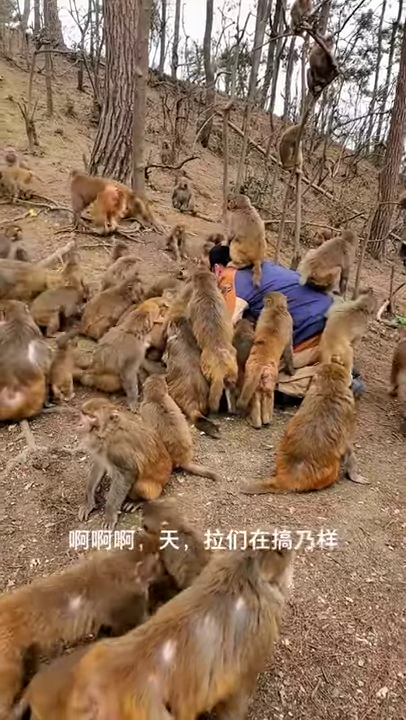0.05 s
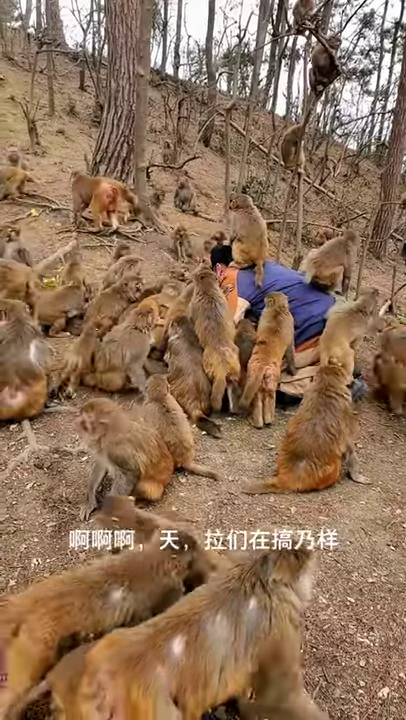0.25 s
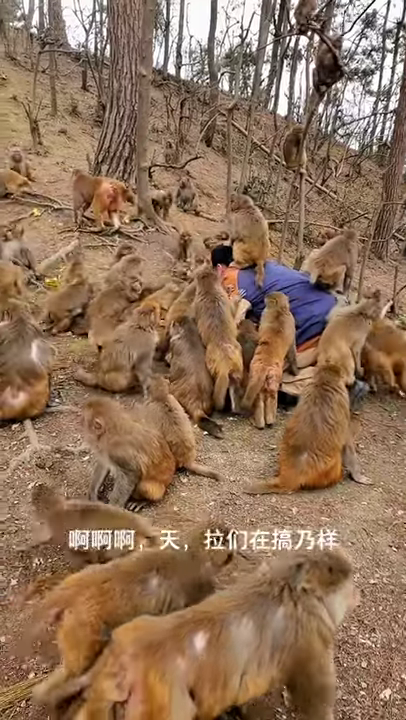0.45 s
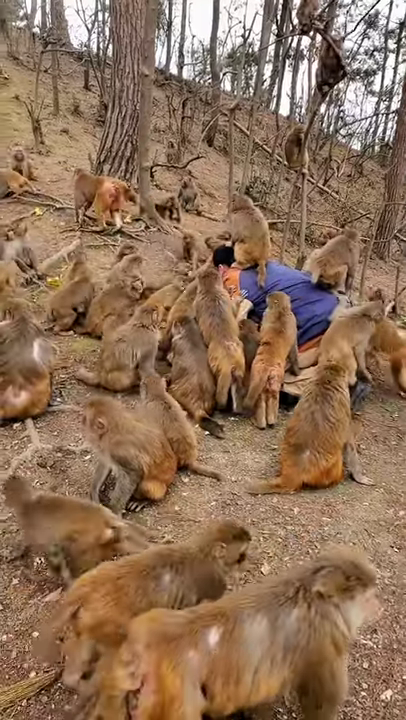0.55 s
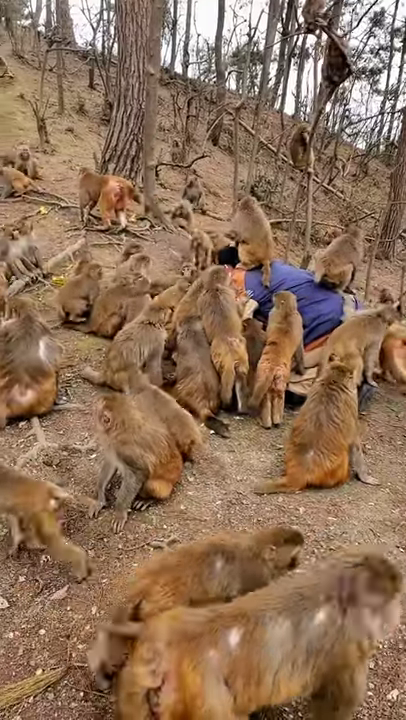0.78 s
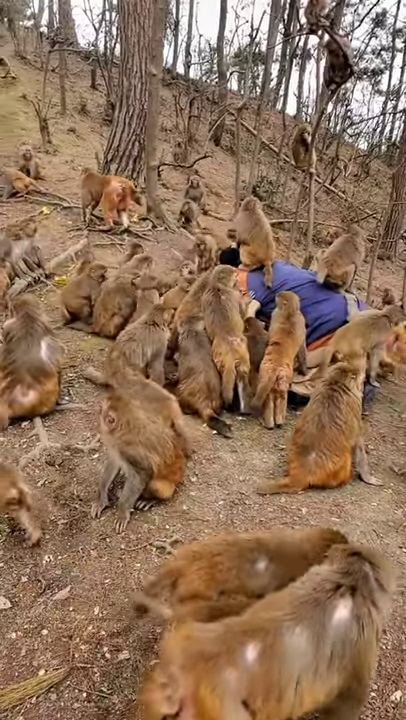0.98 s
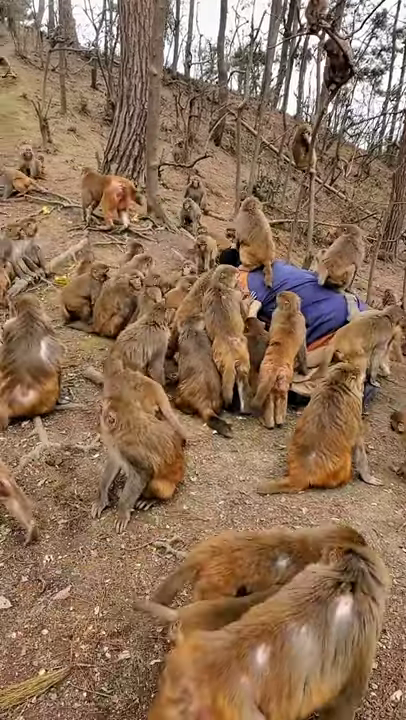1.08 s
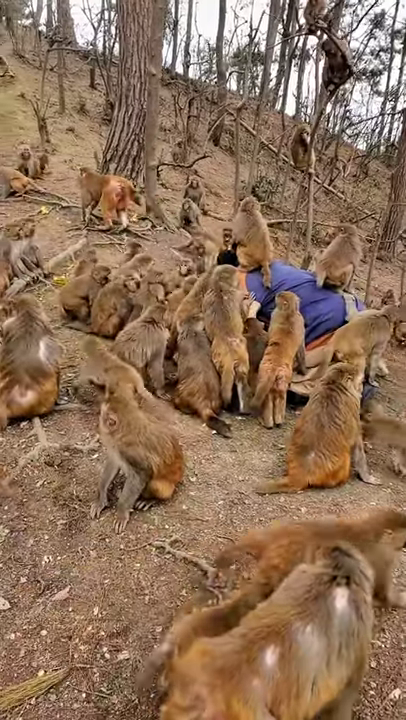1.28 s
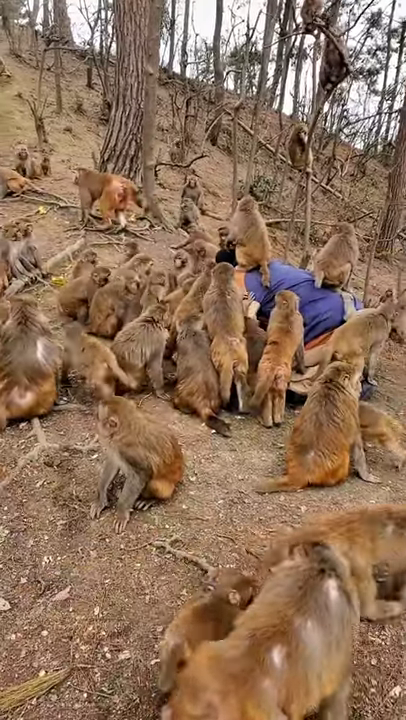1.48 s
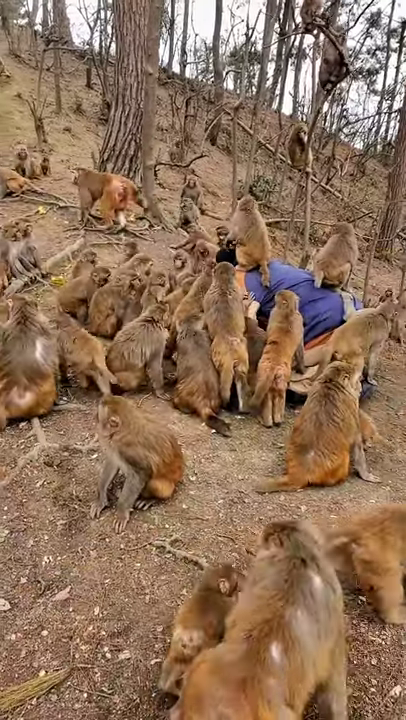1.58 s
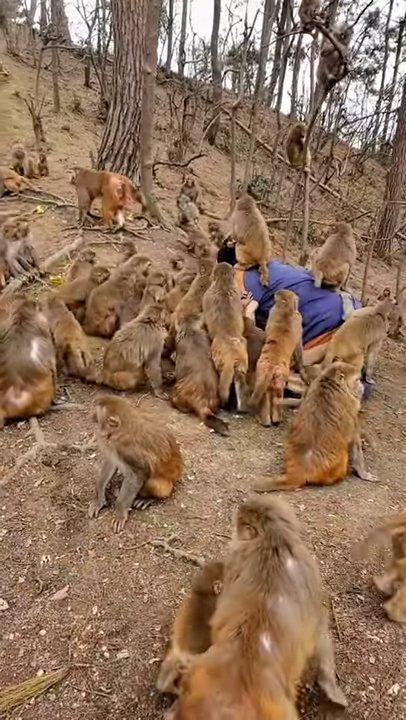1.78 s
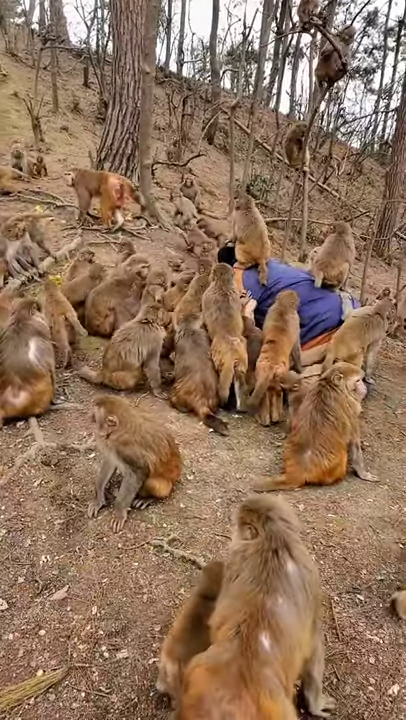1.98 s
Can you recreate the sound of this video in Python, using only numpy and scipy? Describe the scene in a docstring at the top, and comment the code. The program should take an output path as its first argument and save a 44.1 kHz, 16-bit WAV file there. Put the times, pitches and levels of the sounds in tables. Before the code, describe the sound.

Monkeys call over one another outdoors. A hoarse scream and short rasps open; a clear coo rises loudest at 0.2-0.4 s, another brief coo comes near 0.55 s with high squeals. Quieter coos follow at 0.9-1.5 s. A harsh shriek runs 1.4-1.85 s with thin squeals and a sharp yelp near 1.74 s, then a rising squeal at 1.9 s. Leaf rustle, low rumble, sparse woodland echoes; left side brighter.

```python
"""Macaque troop on a wooded hillside

Clear coos and thin high squeals are near sines from smoothly vibrating vocal folds, with weak overtones.
Harsh rasps and long screams are uneven pulses and puffs of air filtered by throat resonances.
Trunks and slope scatter the calls back as sparse decaying echoes; shaped noise gives the rustle of
leaf litter over a low outdoor rumble. Two microphone ports hear it, the left one brighter."""
import sys
import numpy as np
from scipy import signal
from scipy.fft import rfft, irfft, next_fast_len
from scipy.io import wavfile
from scipy.ndimage import uniform_filter1d

SR = 44100
rng = np.random.default_rng(int(sys.argv[2]) if len(sys.argv) > 2 else 0)


def bounce(signal):
    """Save signal as a 16-bit WAV file at the path given by the first command-line argument."""
    frames = np.transpose(np.atleast_2d(signal))
    limited = np.clip(frames, -1, 1)
    pcm = np.round(limited * 32767).astype(np.int16)
    wavfile.write(sys.argv[1], SR, pcm)


def rack_gain(trim_db):
    """Turn a fader trim in dB into the linear factor to multiply a signal by."""
    fader = np.asarray(trim_db, float)
    return 10 ** (fader / 20)


N = 90404


def evened(x):
    """Normalization: scales a signal to rms 1."""
    return x / np.sqrt(np.mean(x ** 2) + 1e-20)


def read(points, hz):
    """Interpolation on a logarithmic frequency axis, as hearing spaces frequencies."""
    f, value = np.transpose(points)
    return np.interp(np.log(hz + 1), np.log(f + 1), value)


def wobble(n, s):
    """Random modulation: noise averaged twice over s seconds, of rms 1."""
    size = max(round(s * SR), 1)
    smooth = uniform_filter1d(rng.standard_normal(n), size)
    return evened(uniform_filter1d(smooth, size))


def curve(rows):
    """Envelope and controls: a call's 3 ms edges and its columns interpolated over time."""
    rows = np.transpose(rows)
    t = np.arange(rows[0, 0], rows[0, -1], 1 / SR)
    edge = np.minimum(np.minimum(t - t[0], t[-1] - t) / 0.003, 1)
    return edge, [np.interp(t, rows[0], c) for c in rows[1:]]


def add(mix, s, sound, side_db, lead_ms):
    """Level and time differences between ports: side_db favours the left, the right hears lead_ms later."""
    n = next_fast_len(len(sound) + 64)
    hz = np.fft.rfftfreq(n, 1 / SR)
    delay = np.exp(-2j * np.pi * hz * abs(lead_ms) / 1000)
    late = irfft(rfft(sound, n) * delay, n)
    for row, part, db in ((0, sound, side_db / 2), (1, late, -side_db / 2)):
        spot = mix[row, round(s * SR):][:len(part)]
        spot += rack_gain(db) * part[:len(spot)]


def tonal(rows, second_db, third_db, waver):
    """Periodic phonation: smooth vocal folds give a near sine with weak harmonics, wavering together."""
    waver_share, waver_db, waver_s = .06, 8, .003  # pitch and level waver (rms) at waver 1
    fourth_db = -13  # below the third harmonic
    overtones_follow = .1  # share of the level changes that the overtones follow
    onset_db = -46  # below this level the overtones die with the voice
    closing_db, closing_from, closing_top_hz = -7, 2.5, 1500

    edge, (hz, db) = curve(rows)
    n = len(hz)
    hz, db = uniform_filter1d(hz, size=300), uniform_filter1d(db, size=100)
    phase = 2 * np.pi * np.cumsum(hz * (1 + waver_share * waver * wobble(n, waver_s))) / SR
    fourth = rack_gain(fourth_db) * np.sin(4 * phase) * (4 * hz < SR / 2)
    overtones = rack_gain(second_db) * np.sin(2 * phase) + rack_gain(third_db) * (np.sin(3 * phase) + fourth)

    # overtones fade as the lips close: closing_db for each octave per second that a pitch below
    # closing_top_hz falls faster than closing_from
    fall = -np.gradient(np.log2(hz)) * SR
    closing = closing_db * (hz < closing_top_hz) * np.clip(fall - closing_from, 0, 8)
    follow = np.minimum(overtones_follow * (db - db.max()), db - onset_db)
    overtone_gain = rack_gain(follow + closing + 2.5 * wobble(n, 0.012))
    tone = rack_gain(db) * np.sin(phase) + overtone_gain * overtones
    return np.sqrt(2) * edge * rack_gain(waver_db * waver * wobble(n, waver_s)) * tone


def add_tonal(mix, curves, callers):
    """Superposition: each periodic call is summed into the mix at its own place."""
    for rows, (second_db, third_db, waver, side_db) in zip(curves, callers):
        add(mix, rows[0][0], tonal(rows, second_db, third_db, waver), side_db, lead_ms=0.06)


def coos(mix):
    """Clear coos: low-pitched periodic phonation along gliding pitch curves."""
    # One curve per coo. Each row: time in seconds, pitch in hertz, level in dB before the waver.
    coo_curves = [
        [(0.175, 695, -53), (0.203, 826.5, -29), (0.259, 982, -16.5), (0.285, 1064, -11.5),
         (0.331, 1115, -15.5), (0.359, 1108, -17.5), (0.377, 1073, -14.5), (0.389, 1054, -28),
         (0.397, 1075, -40), (0.42, 1116, -62)],
        [(0.335, 687.4, -47.5), (0.561, 878, -42), (0.749, 745, -45), (0.79, 657, -63)],
        [(0.495, 982, -92), (0.505, 1012, -56), (0.525, 1078, -27.5), (0.557, 1028, -13.5),
         (0.567, 1002, -24.5), (0.573, 1036, -14), (0.581, 970, -27.5), (0.593, 902, -30), (0.619, 812, -30.5),
         (0.64, 830, -65)],
        [(.888, 908, -77), (.9, 937, -50.5), (.92, 924, -39), (.945, 937, -21.5), (.962, 1007, -21),
         (.972, 965, -32.5), (.99, 912, -38.5), (1.012, 921, -59)],
        [(1.02, 857, -51), (1.046, 881.5, -48), (1.1, 910, -40), (1.12, 937, -36.5), (1.135, 1008, -29),
         (1.15, 960, -28), (1.174, 818, -34.5), (1.19, 696, -45), (1.21, 650, -55)],
        [(1.28, 660, -88), (1.288, 619, -42.5), (1.346, 705.3, -34.5), (1.416, 815, -43.5), (1.458, 853, -42.5),
         (1.475, 870, -65)],
        [(1.985, 846, -56.5), (2.029, 874, -51.5), (2.05, 840, -54)],
    ]
    # Each row: second and third harmonic in dB at the loudest moment, waver 0-1, left minus right in dB.
    coo_callers = [(-51.5, -44.5, 0.01, 1.5), (-77, -80, 0.05, -5.5), (-57.5, -73, 0.2, 1.5),
                   (-42.5, -44.5, 0.08, 3), (-46, -49, 0.13, 3.5), (-63.5, -71.5, 0.22, 1.5),
                   (-50, -43, 0, 7)]
    add_tonal(mix, coo_curves, coo_callers)


def squeals(mix):
    """Thin squeals: high-pitched periodic phonation with few audible harmonics."""
    # One curve per squeal. Each row: time in seconds, pitch in hertz, level in dB before the waver.
    squeal_curves = [
        [(0.228, 5370, -49.5), (0.268, 7150, -40), (0.285, 7340, -47)],
        [(0.505, 6900, -45), (.527, 6280, -45), (.532, 5570, -39.5), (0.577, 4175, -40), (0.612, 3960, -39)],
        [(0.585, 2346, -53), (0.609, 2724, -35.5), (0.625, 2600, -48)],
        [(0.958, 2006, -46), (.974, 2094, -34), (.982, 2100, -43), (.992, 2213, -34), (1., 2306, -40.5),
         (1.015, 2390, -34.5), (1.04, 2700, -47)],
        [(1.418, 4720, -44), (1.44, 4850, -43), (1.449, 5250, -43), (1.458, 4830, -45)],
        [(1.475, 5214, -50), (1.492, 5596, -40), (1.505, 5600, -42), (1.512, 5350, -41), (1.525, 5860, -50),
         (1.55, 5960, -60.5), (1.564, 5920, -46), (1.577, 4750, -38), (1.592, 4750, -48), (1.597, 4940, -36),
         (1.61, 4970, -38)],
        [(1.56, 4060, -43), (1.575, 3180, -43.5), (1.59, 3240, -47.5), (1.61, 3300, -53)],
        [(1.607, 4440, -36), (1.645, 4780, -40.5), (1.678, 5150, -41), (1.715, 5200, -50)],
        [(1.676, 6150, -39), (1.688, 5820, -39.5), (1.706, 6160, -39.5), (1.722, 5340, -44)],
        [(1.722, 5300, -40), (1.75, 4953, -38), (1.761, 4560, -37), (1.77, 3000, -36)],
        [(1.734, 2240, -42), (1.738, 2200, -23.5), (1.743, 2120, -23), (1.748, 1856, -45), (1.756, 1730, -28.5),
         (1.765, 1673, -62)],
        [(1.893, 1917, -38), (1.932, 2345, -27.5), (1.98, 2866, -44)],
    ]
    # Each row: second and third harmonic in dB at the loudest moment, waver 0-1, left minus right in dB.
    squeal_callers = [(-80, -90, .4, 3), (-75, -90, .35, 3), (-70, -80, .2, 0), (-66, -72, .3, 0),
                      (-70, -76, .22, 3), (-78, -80, .22, 4), (-85, -90, .15, 4), (-62, -62, .15, 4),
                      (-80, -80, .1, 4), (-60, -80, .1, 4), (-49, -70, .2, 0), (-55, -66, .06, -3)]
    add_tonal(mix, squeal_curves, squeal_callers)


def resonate(x, hz, width):
    """Moving resonance: shifts hz down to zero, applies two equal poles of peak gain 1, shifts back."""
    turn = np.exp(2j * np.pi * np.cumsum(np.minimum(hz, .45 * SR)) / SR)
    r = np.exp(-np.pi * width / SR)
    lowpassed = signal.lfilter([(1 - r) ** 2], [1, -2 * r, r * r], x / turn)
    return 2 * (turn * lowpassed).real


def harsh(pulse_hz, rough, mouth_hz, throat):
    """Source-filter voice: uneven pulses and puffs of air drive parallel throat resonances; rms 1."""
    jitter = .06  # rms share of the pulse rate at roughness 1
    n = len(mouth_hz)
    turns = np.cumsum(pulse_hz * (1 + jitter * rough * wobble(n, 0.00639))) / SR
    harmonics = range(1, int(SR / 2 / np.max(pulse_hz) / 1.15))
    folds = sum(np.cos(2 * np.pi * k * turns) for k in harmonics)
    # noise a little stronger just after each pulse
    puffs = (2.6 + np.exp(-(turns % 1) / 2.1)) * rng.standard_normal(n)
    rough = np.clip(rough, 0, 1)
    drive = (1 - rough) * evened(folds) + rough * evened(puffs)
    voice = 0
    for k, (share, width, db) in enumerate(throat):
        voice = voice + (-1) ** k * rack_gain(db) * resonate(drive, share * mouth_hz, width)
    return evened(voice)


def rasps(mix):
    """Short rasping calls: half pulses, half turbulent puffs, through a fixed throat shape."""
    # Each row: start in seconds, length in seconds, level in dB before fade and flutter,
    # mouth frequency in hertz, left minus right in dB.
    rasp_calls = [(0., 0.048, -48, 3220, 0), (0.023, 0.11, -37.5, 2500, -1),
                  (0.13, 0.084, -33.5, 2710, -2.5), (0.204, 0.11, -31.5, 2530, -2),
                  (0.291, .1, -36, 2520, -2.5), (0.523, 0.11, -41, 1910, 0.5),
                  (0.632, 0.064, -34, 2630, -4.5), (0.967, 0.042, -49, 2770, -12),
                  (1.095, 0.068, -38.5, 2500, -7), (1.677, 0.026, -31.5, 1820, 5),
                  (1.712, 0.035, -38.5, 1820, 4.5), (1.711, 0.036, -36, 2720, 7.5),
                  (1.79, 0.013, -35, 2070, 3), (1.96, 0.089, -41, 2310, -2), (2.008, 0.057, -40, 2500, -8)]
    # Each row: share of the mouth frequency, pole width in hertz, relative gain in dB.
    rasp_throat = [(1.002, 430, 3), (1.252, 585, -6.5), (1.5, 648, -6.5), (2, 1300, -13.5)]
    rise_s, fade_db = 0.013, -9.5

    for start, length, db, mouth_hz, side_db in rasp_calls:
        t = np.arange(0, length, 1 / SR)
        ramps = np.minimum(np.minimum(t, length - t) / rise_s, 1)
        fade = fade_db * (t / length) ** 2
        shape = ramps * rack_gain(db + fade + 2.1 * wobble(len(t), 0.0041))
        pulse_hz = 346 * rng.uniform(.9, 1.1)
        voice = harsh(pulse_hz, rough=.5, mouth_hz=mouth_hz + 0 * t, throat=rasp_throat)
        add(mix, start, shape * voice, side_db, lead_ms=0.059)


def screams(mix):
    """Long screams: pulses and turbulence whose throat resonances glide as the mouth frequency moves."""
    # One curve per scream. Each row: time in seconds, level in dB before the flutter,
    # mouth frequency in hertz, roughness 0-1.
    scream_curves = [
        [(0., -39.5, 5200, 0.89), (.2, -54.5, 5120, 0.83), (.25, -42, 7230, 0.45), (.31, -41.5, 9690, 0.3),
         (.36, -42, 8060, 0.45), (.41, -36, 6125, 0.4), (.46, -39, 6590, 0.4), (.51, -39, 6500, 0.5),
         (.56, -42, 5500, 0.88), (.65, -43, 4344, 0.63), (.74, -52, 4155, 0.37)],
        [(1.17, -58, 4200, .3), (1.205, -46, 4180, .08), (1.25, -49, 4400, 0.16), (1.33, -64, 4650, 0)],
        [(1.365, -49.5, 3576, 0.65), (1.39, -50.5, 4610, 0.5), (1.412, -44, 5100, 0.5),
         (1.425, -55.5, 4830, 0.6), (1.465, -43, 5000, 0.45), (1.495, -42, 5600, 0.35),
         (1.515, -46, 5350, 0.55), (1.53, -42, 6050, 0.38), (1.56, -42, 6000, 0.45), (1.578, -48, 5040, .7),
         (1.7, -42, 5290, 0.63), (1.76, -38.5, 4890, 0.76), (1.86, -58.5, 5050, 0.75)],
    ]
    # Each row: pulse rate in hertz at the mean mouth frequency, how far the rate follows the mouth 0-1,
    # left minus right in dB, throat rows (share of mouth frequency, pole width in hertz, gain in dB).
    screamers = [(547, .15, -0.5, [(.6, 1190, 9), (1, 2615, 7), (1.4, 3496, -3), (2.0, 4900, -8)]),
                 (474, 1, -8, [(.85, 900, -2), (1.08, 1370, 3)]), (733.5, 0.99, 0, [(.8, 920, 7.5),
                 (1, 1160, 9), (1.2, 1450, 2.5), (2.4, 4100, -12.5)])]

    for rows, (pulse_hz, follow, side_db, throat) in zip(scream_curves, screamers):
        edge, (db, mouth_hz, rough) = curve(rows)
        flutter_db = 1.3 * wobble(len(db), .003)
        moving_hz = pulse_hz * (mouth_hz / mouth_hz.mean()) ** follow
        voice = harsh(moving_hz, rough, mouth_hz, throat)
        add(mix, rows[0][0], edge * rack_gain(db + flutter_db) * voice, side_db, lead_ms=0.059)


def troop():
    """Superposition of all direct calls at the two ports."""
    mix = np.zeros((2, N))
    coos(mix)
    squeals(mix)
    rasps(mix)
    screams(mix)
    return mix


def woods(x):
    """Scattering: sparse echoes from trunks and slope, each band decaying exponentially at its own speed."""
    # Each row: frequency in hertz, time to decay by 60 dB in seconds.
    decay_times = [(500, 0.77), (1100, 0.27), (3000, 0.55), (9000, 0.41)]
    taps = np.zeros((2, SR))
    slots = np.arange(400, SR - 20, 20)  # one echo in every 20 samples
    at = slots + rng.integers(0, 20, (2, len(slots)))
    np.put_along_axis(taps, at, rng.choice([-1., 1.], at.shape), 1)
    hz, t, z = signal.stft(taps, SR, nperseg=256)
    decay = rack_gain(-60 * t / read(decay_times, hz)[:, None])
    tail = signal.istft(z * decay, SR, nperseg=256)[1]
    tail = tail / np.linalg.norm(tail[0])
    return signal.fftconvolve(x.mean(0)[None], tail, axes=1)[:, :N]


def bed():
    """Partly coherent noise: low rumble alike at both ports, patchy rustle swelling as the animals move."""
    # Rumble and rustle. Each row: frequency in hertz, relative density in dB per hertz.
    bed_spectrum = [(20, -34), (35, -36), (50, -18), (64, 3), (100, -6.5), (125, -9.5), (240, -16.5),
                    (400, -23.5), (1000, -25.5), (1400, -30), (2500, -26), (5000, -31.5), (7500, -44),
                    (12000, -47), (15500, -47)]
    # Each row: frequency in hertz, left-right coherence 0-1.
    likeness = [(60, 1), (180, 0.98), (540, 0.67), (1640, 0.11), (14800, 0.068)]
    # Leaf litter stirred. Each row: time in seconds, gain in dB far above rustle_from_hz.
    rustle_swells = [(0, 1.5), (.5, 8), (.8, 0), (1.1, 2), (1.5, 1.5), (2.05, 3.5)]
    # Each row: time in seconds, swell in units worth 3.5 dB at the lowest, 2.5 dB at the highest pitches.
    rumble_swells = [(0, 2), (.22, 2.5), (.4, 1), (.6, 1.5), (1.951, 1), (2.05, 3.5)]
    rustle_from_hz = 630

    frames, hz = N // 512 + 5, np.fft.rfftfreq(2048, 1 / SR)
    a, b, c, d, patches = rng.standard_normal((frames, 1025, 5)).T
    patches = uniform_filter1d(uniform_filter1d(patches, 24, 0), 5, 1)  # over bins, then frames
    patches = evened(patches)
    t = np.arange(frames) * 512 / SR
    stir = np.interp(t, *np.transpose(rustle_swells))
    swell = np.interp(t, *np.transpose(rumble_swells))

    same = np.clip(read(likeness, hz), -1, 1)[:, None]
    left = a + 1j * b
    right = same * left + np.sqrt(1 - same ** 2) * (c + 1j * d)
    z = np.array([left, right]) * rack_gain(read(bed_spectrum, hz))[:, None]
    steady = signal.istft(z, nperseg=2048, noverlap=1536)[1]
    scale = rack_gain(-48) / np.sqrt(np.mean(steady ** 2))  # rms of -48 dB before patches and swells
    high = (hz ** 2 / (hz ** 2 + rustle_from_hz ** 2))[:, None]
    z *= rack_gain(high * (4.9 * patches + stir) + (3.5 - high) * swell)
    return scale * signal.istft(z, nperseg=2048, noverlap=1536)[1][:, :N]


def scene():
    """Superposition of direct calls, their echoes and the background."""
    calls = troop()
    return calls + rack_gain(-10.5) * woods(calls) + bed()


def top_cut(x):
    """Nothing passes above the cut-off."""
    return signal.sosfilt(signal.butter(12, 15420, fs=SR, output="sos"), x)


def record(dry):
    """Diffraction: the left port hears more treble; the shaded right one gets it by scattered paths."""
    # Each row: frequency in hertz, left minus right in dB.
    port_tilt = [(60, -.5), (200, -1.5), (380, 0), (800, 4), (2400, 4), (5000, 7), (6800, 10), (8000, 22),
                 (9300, 10), (15000, 9)]
    shade_hz = 2500  # above this the right port hears sound scattered round the body
    shade_s = 0.0099  # time for a path's amplitude to fall by a factor e
    half_turns_per_s = 9  # how fast the paths exchange

    n = next_fast_len(N + 4096)
    hz = np.fft.rfftfreq(n, 1 / SR)
    tilt, high = read(port_tilt, hz), hz ** 4 / (hz ** 4 + shade_hz ** 4)
    paths = rng.standard_normal((3, 2048)) * np.exp(-np.arange(2048) / (shade_s * SR))
    paths /= np.linalg.norm(paths, axis=1)[:, None]
    half_turns = half_turns_per_s * np.arange(N) / SR + np.arange(3)[:, None] / 3
    share = np.sqrt(2 / 3) * np.cos(np.pi * half_turns)  # squared shares sum to 1
    scattered = (rfft(dry[1] * share, n) * rfft(paths, n)).sum(0)
    right = np.sqrt(1 - high) * rfft(dry[1], n) + np.sqrt(high) * scattered
    left_db = np.minimum(tilt, 10) / 2
    ports = np.array([rack_gain(left_db) * rfft(dry[0], n), rack_gain(left_db - tilt) * right])
    return top_cut(irfft(ports, n)[:, :N])


dry = scene()
out = record(dry)
bounce(out)
```